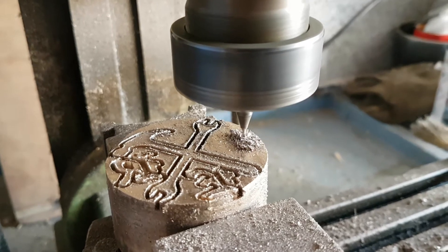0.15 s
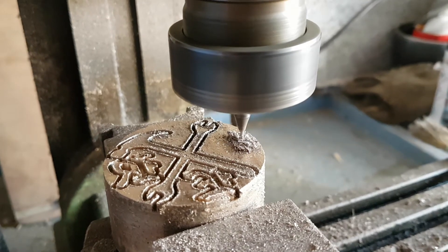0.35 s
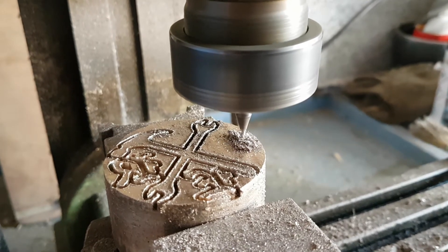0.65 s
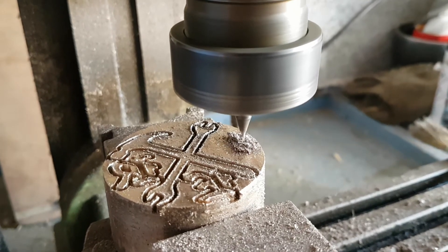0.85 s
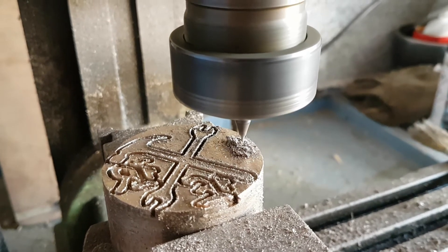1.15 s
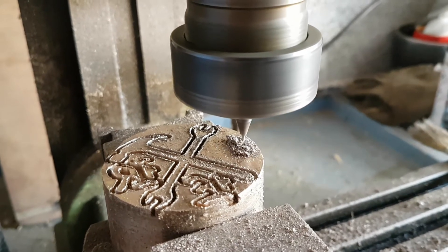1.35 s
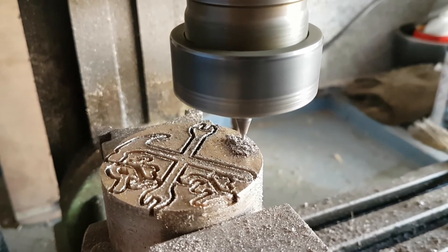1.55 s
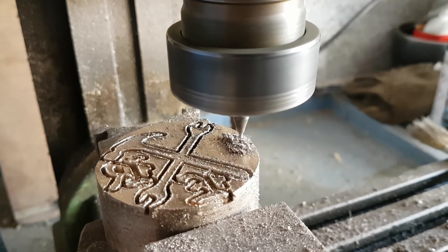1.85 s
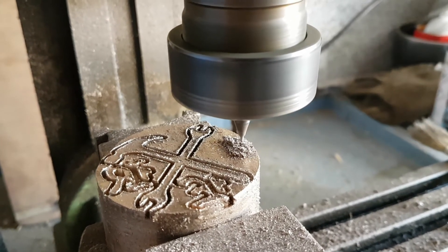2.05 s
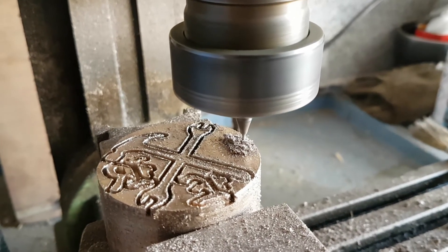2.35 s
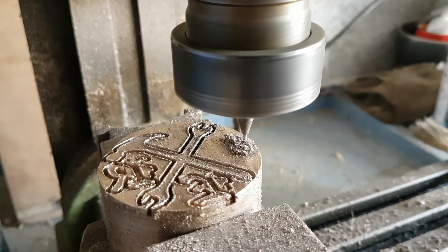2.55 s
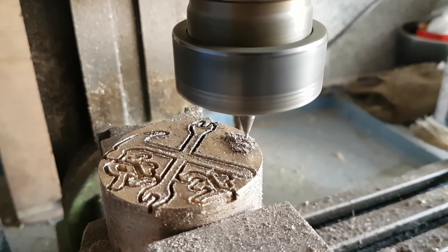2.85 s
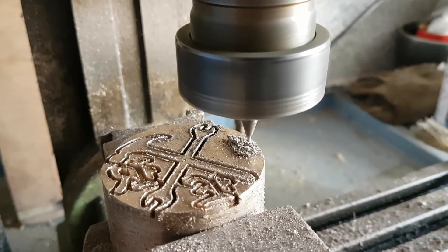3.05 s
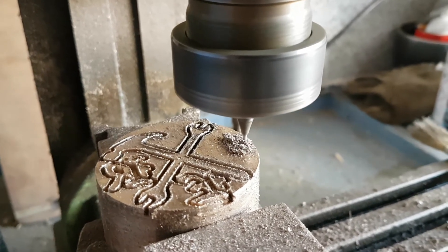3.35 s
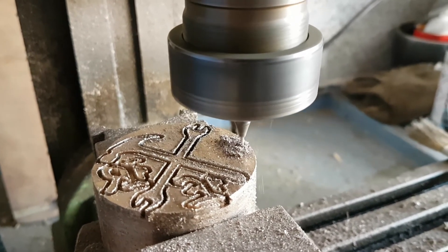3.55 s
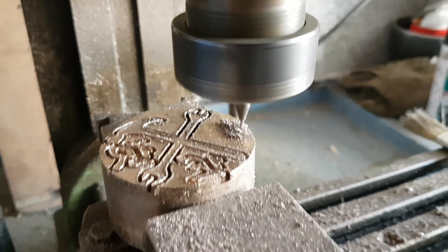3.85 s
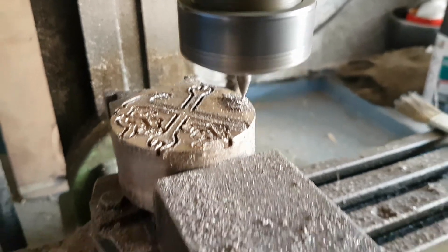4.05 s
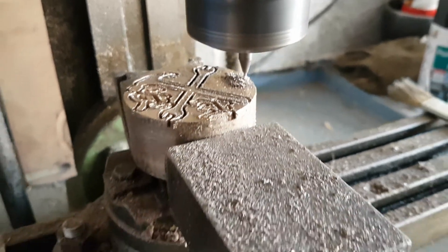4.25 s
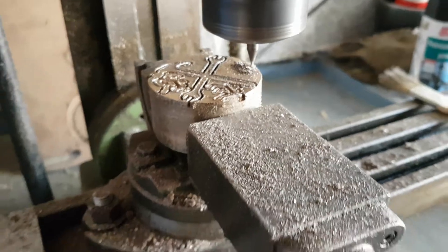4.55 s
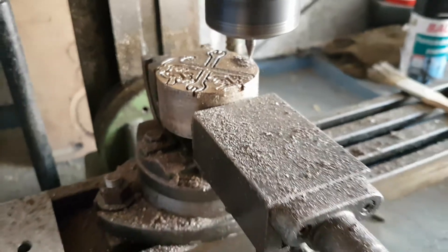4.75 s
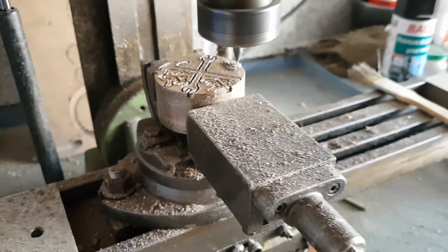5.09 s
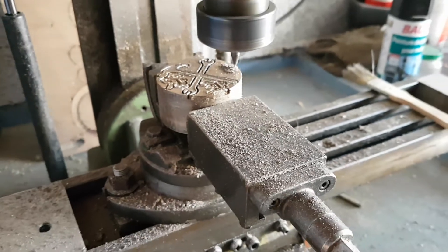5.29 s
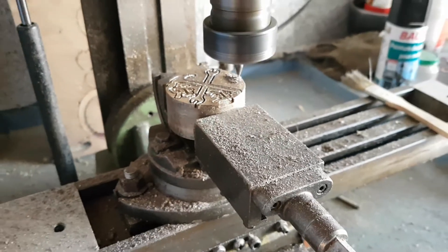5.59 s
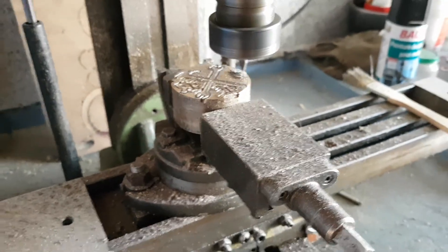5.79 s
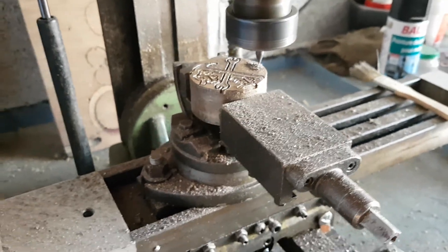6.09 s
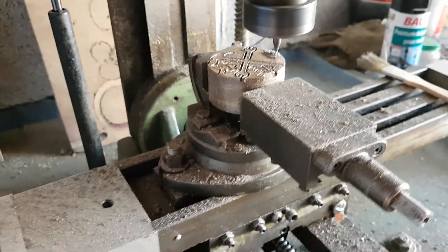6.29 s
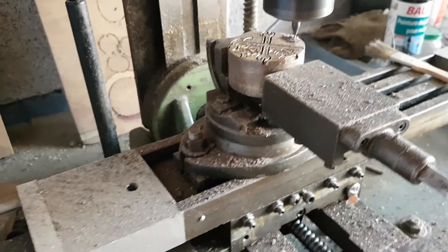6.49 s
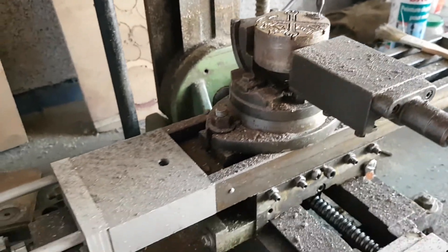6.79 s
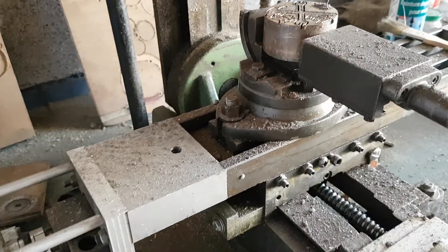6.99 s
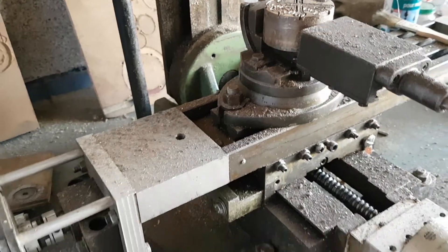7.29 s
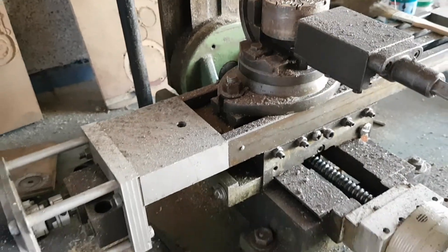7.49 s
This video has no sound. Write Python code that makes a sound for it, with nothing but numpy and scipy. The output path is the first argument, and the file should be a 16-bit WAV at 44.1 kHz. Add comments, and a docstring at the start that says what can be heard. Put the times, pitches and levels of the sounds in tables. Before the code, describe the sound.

A milling machine spindle whines steadily in several metallic pitches over a rough noisy roar as it engraves a metal disc, ending in quick soft ticking.

```python
"""The spindle drive of a milling machine, engraving a metal disc in a small workshop, whines as a comb of tones.
The tones are cosines that share one drifting speed. Over a roar of shaped noise, low hums come and go as wavering
cosines, the feed drive whistles as a tone that hops in pitch, and its slow steps tick as short ringing knocks.
A handheld pair of microphones starts close, then backs away through the room's standing waves, so drive tones
swell and fade on their own."""
import sys
import numpy as np
from scipy import signal
from scipy.fft import irfft, next_fast_len
from scipy.io import wavfile
from scipy.ndimage import uniform_filter1d, map_coordinates

SR = 44100
rng = np.random.default_rng(int(sys.argv[2]) if len(sys.argv) > 2 else 0)


def level_to_linear(level):
    """Convert decibel levels to linear amplitude factors, elementwise."""
    exponent = np.asarray(level, float) / 20
    return 10 ** exponent


def persist_wave(psi):
    """Save psi, clipped to +-1, as 16-bit WAV."""
    counts = np.round(np.clip(psi, -1, 1) * 32767).astype(np.int16)
    wavfile.write(sys.argv[1], SR, np.atleast_2d(counts).T)


N = 336483
T = np.arange(N) / SR  # time in seconds

# Loud tones of the drive. Each row: pitch in Hz, lead of the left side in rad.
TONES = [(630.74, .52), (686.71, .78), (1618.85, -1.72), (1621.67, -2.56), (1674.78, .35), (1677.67, 2.4),
         (2333.52, .11), (2606.94, -2.52), (2662.89, 1.22), (3181.05, 1.96), (3321.62, -.73),
         (3406.24, .86)]
# Backing away, for the fainter tones and the roar. Each row: time in seconds, share of the way (0-1).
AWAY = [(0, 0), (3.9, 0), (4.6, 0.16), (5.3, 0.93), (7.63, 0.9)]
# Path through the standing waves. Each row: time in seconds, share walked (0-1).
WALK = [(0, 0), (3.6, 0), (4.4, .16), (5.2, .51), (6, .6), (6.8, .85), (7.63, 1)]
MESH_HZ, SHAFT_HZ = 329.37, 27.97  # gear mesh and shaft rates
CREEP_FROM_S, STEP_S = 7.045, .0517  # when the feed starts to creep, and time between its slow steps


def along(rows, t=T):
    """Every column of a table after the first, read at the times t."""
    s, *columns = np.transpose(rows)
    return [np.interp(t, s, c) for c in columns]


def drift(count, hz):
    """Slow random curves of rms about 1 that change about hz times a second."""
    knots_per_s = 40
    knots = int(T[-1] * knots_per_s) + 2
    rough = rng.standard_normal((count, 3 * knots))
    low_pass = signal.butter(2, np.clip(hz / 20, .01, .95))
    smooth = signal.filtfilt(*low_pass, rough)[:, knots:2 * knots]  # the middle third has no edge effects
    smooth /= smooth.std(1, keepdims=True)
    curves = [np.interp(T[::16] * knots_per_s, np.arange(knots), row) for row in smooth]
    return np.array(curves).repeat(16, 1)[:, :N]


def spindle_time():
    """Seconds as counted by the spindle: all its tones follow one speed."""
    # Spindle speed. Each row: time in seconds, excess over nominal in parts per thousand.
    speed = [(0.0, -0.03), (0.8, -0.29), (1.6, -0.11), (2.4, -0.22), (3.2, 0.09), (4.0, 0.09), (4.8, 0.04),
             (5.6, 0.39), (6.4, 1.14), (7.2, 0.97), (7.63, 0.74)]
    return np.cumsum(1 + along(speed)[0] / 1000) / SR


def loud_tones(waver=0.045, waver_hz=7, direct_fall_db=-5.8):
    """Direct sound and one echo of each tone meet at each microphone and slide through each other on the walk."""
    # Standing wave of each loud tone at a microphone. Each row: starting level of the direct sound in dB,
    # echo over that in dB, number of wave crests passed on the walk, share of the walk at a crest.
    left_waves = [(-27.5, -18, 1.48, 0.48), (-33, 4.9, -0.45, 1.08), (-31, -8.6, -1.11, .22),
                  (-35.5, -12.5, -1.53, .255), (-33, -2.3, -1.41, .536), (-39.3, -1.9, -2.08, .005),
                  (-42.5, 8.5, -2.5, .009), (-30.5, -9.5, 1.64, 0.55), (-32.5, -3, -1.14, 0.74),
                  (-28.5, -6, 0.36, 1.66), (-23, -10.5, -1.37, 0.17), (-38.5, -7, 1.26, 0.12)]
    right_waves = [(-27.5, -12.4, 0.66, 0.61), (-34, 4.5, -0.73, 1.19), (-27, -3.7, -.37, 1.667),
                   (-30.8, 1.9, .27, 1.427), (-41.6, 8.4, .47, 1.069), (-32.7, -19.4, 1.94, .358),
                   (-33, -2.5, -3, 0.079), (-37.8, 12.7, 0.87, 0.32), (-24, -9, -0.9, .25),
                   (-33, -10.5, 0.5, 0.061), (-22.5, -5.9, 2.04, 0.29), (-33, 2.3, 1, 0.27)]
    # Close pairs that beat slowly. Each row: rough pitch in Hz, spindle time when in step in seconds.
    twins = [(1620, .005), (1676, .046)]
    # The lowest loud tone swells and dips at both microphones alike. Each row: time in seconds, change in dB.
    lowest_swell = [(0, -2), (1.45, 1.5), (3.3, -1), (4.1, 1), (4.4, -2.5), (4.7, 1), (6.2, 3), (6.4, -2.5),
                    (7.63, -1.5)]
    clock, walked, out = spindle_time(), along(WALK)[0], np.zeros((2, N))
    tone_hz, starts = np.array(TONES)[:, 0], rng.random(len(TONES))  # starts are in turns
    for hz, in_step_s in twins:
        pair = abs(tone_hz - hz) < 5
        starts[pair] = starts[pair][0] - tone_hz[pair] * in_step_s
    for (hz, lead), start, *waves in zip(TONES, starts, left_waves, right_waves):
        direct_db, echo_db, crests, crest_at = np.transpose(waves)[:, :, None]
        size, turn = waver * drift(count=2, hz=waver_hz)
        if hz == tone_hz[0]:
            direct_db = direct_db + along(lowest_swell)[0]
        angle = 2 * np.pi * (hz * clock + start) + turn + np.array([[lead], [0]])
        direct = level_to_linear(direct_fall_db * walked) * np.cos(angle)
        echo = level_to_linear(echo_db) * np.cos(angle + 2 * np.pi * crests * (walked - crest_at))
        out += np.sqrt(2) * (1 + size) * level_to_linear(direct_db) * (direct + echo)
    return out


def bass_tones(waver=0.12):
    """Low drive tones, too long in wavelength to pass crests: they waver a little and fall with distance."""
    # Each row: pitch in Hz, starting left level in dB, starting right level in dB, change over the walk in dB.
    bass = [(70.2, -33.5, -32, -5), (211.3, -40, -38.5, -13.5)]
    clock, walked, out = spindle_time(), along(WALK)[0], np.zeros((2, N))
    for (hz, left_db, right_db, fall_db), size in zip(bass, drift(count=2, hz=7)):
        level_db = np.array([[left_db], [right_db]]) + fall_db * walked
        out += np.sqrt(2) * (1 + waver * size) * level_to_linear(level_db) * np.cos(2 * np.pi * hz * clock)
    return out


def side_tones(waver=0.3, fading_db=4.5):
    """Weaker tones of shafts and bearings; once the microphones move, each fades in and out at random."""
    # Each row: pitch in Hz, left level close by in dB, right level close by in dB,
    # level far off before the random fading in dB, lead of the left side in rad.
    weak_tones = [(92.9, -43.0, -44.0, -43.0, -0.3), (140.6, -47, -46, -45, 0),
                  (504.0, -42.0, -42.0, -47.0, -0.1), (530.9, -42.0, -40.0, -44.0, 0.1),
                  (658.8, -40.0, -41.0, -43.0, 0.3), (741.5, -51.0, -49.0, -41.0, 0.4),
                  (823.6, -46, -47, -48, 1.0), (1017.4, -46, -50, -48, 1.8), (1292.0, -46, -52, -51, 2.0),
                  (1453.5, -48, -48, -50, 0), (1592.8, -42.0, -40.0, -42.0, -0.5),
                  (1730.7, -38.0, -36.0, -45.0, 2.6), (1948.1, -37.0, -37.0, -47.0, 0.3),
                  (2004.6, -47, -41, -46, 0.3), (2277.8, -40.0, -36.0, -43.0, -1.5),
                  (2355.2, -42.0, -43.0, -45.0, -0.0), (2594.8, -45.0, -39.0, -44.0, -0.7),
                  (2936.6, -40.0, -45.0, -44.0, -0.7), (2941.3, -42.0, -47.0, -45.0, -0.4),
                  (2992.3, -46, -46, -42, .3), (3265.6, -37.0, -31.0, -37.0, -2.9),
                  (3349.8, -38.0, -39.0, -47.0, -2.8), (3356.5, -40.0, -37.0, -44.0, -2.7),
                  (3377.3, -41.0, -31.0, -42.0, -1.5), (3462.1, -54.0, -38.0, -43.0, 1.5),
                  (3846.4, -47, -53, -51, 3.0), (3924.4, -43.0, -42.0, -48.0, 2.4),
                  (3981.0, -47, -49, -52, 2.5), (4309.3, -46, -50, -51, 2.9), (4885.3, -63, -52, -50, 2.8),
                  (4968.4, -54, -43, -50, 0.9), (5571.7, -55, -48, -51, -3.0), (5655.2, -54, -51, -47, 1.7),
                  (5737.0, -62, -50, -49, 1.4), (5846.3, -58, -51, -48, .4)]
    clock, away, out = spindle_time(), along(AWAY)[0], np.zeros((2, N))
    wobble, fading = drift(count=12, hz=3.3), drift(count=12, hz=0.73)
    for k, (hz, left_db, right_db, far_db, lead) in enumerate(weak_tones):
        pick = (k + np.array([0, 5])) % len(fading)  # the two sides take different curves
        close_db = np.array([[left_db], [right_db]])
        level_db = close_db + away * (far_db - close_db + fading_db * fading[pick])
        angle = 2 * np.pi * (hz * clock + rng.random()) + waver * wobble[pick[0]]
        size = 1 + waver * wobble[pick[1]]
        out += np.sqrt(2) * size * level_to_linear(level_db) * np.cos([angle + lead, angle])
    return out


def comb(above_db=21.0, spread_db=34.0, top_hz=8000, slip_hz=2.82):
    """A forest of faint lines at sums of mesh, shaft and slip rates, coloured like the roar."""
    mesh, shaft, slip = np.mgrid[2:25, -6:6, -1:2].reshape(3, -1)
    hz = mesh * MESH_HZ + shaft * SHAFT_HZ + slip * slip_hz
    loud_hz = np.array(TONES)[:, :1]
    hz = hz[abs(hz - loud_hz).min(0) > 6]  # the loud tones already hold these places
    size, away, out = next_fast_len(N + SR), along(AWAY)[0], np.zeros((2, N))
    bins, same = np.round(hz * size / SR).astype(int), likeness(hz)
    close_share, far_share = np.cos(away * np.pi / 2), np.sin(away * np.pi / 2)
    for place, share in ((0, close_share), (1, far_share)):
        a, b, strength = rng.random((len(hz), 3)).T
        left, other = np.exp(2j * np.pi * a), np.exp(2j * np.pi * b)
        pair = np.array([left, same * left + np.sqrt(1 - same ** 2) * other])
        colour = np.sqrt(roar_power(hz, np.full((1, 1), place))[:, 0])
        level = colour * level_to_linear(above_db - spread_db * np.sqrt(strength))
        lines = np.zeros((2, size // 2 + 1), complex)
        lines[:, bins] = pair * level / (1 + (hz / top_hz) ** 4) * size / 2
        steady = irfft(lines, size)
        # read at spindle time, so the lines follow the spindle speed
        out += share * [map_coordinates(side, [spindle_time() * SR], order=3) for side in steady]
    return out


def low_hums(fade_s=0.23, left_gain_db=-0.2):
    """Low tones that fade in and out, wavering; those near the lowest drive tone beat with it."""
    # Low hums that come and go: feed motors at several pitches, a returning tone near 252 Hz, a swell of the
    # 211 Hz drive tone. Each row: start in seconds, end in seconds (both at mid-fade), pitch in Hz,
    # level before panning in dB, wavering share (0-1).
    hums = [(.3, 0.96, 74.6, -38, 0.14), (1.6, 3.16, 73.4, -34.5, 0.3), (0, 0.97, 165, -40.5, 0.6),
            (2.1, 3.42, 136, -42, 0.1), (2.1, 3.3, 161, -41.5, 0.7), (1.94, 3.1, 282, -42.5, 0.7),
            (5.9, 6.6, 100, -49, .2), (4, 5, 96, -39, .2), (3, 5.4, 195, -45.5, 0.55),
            (5.5, 6, 287, -41.5, 0.8), (0, 1.33, 251.5, -41, .1), (3.5, 7.2, 252.1, -38, 0.07),
            (5.5, 6.4, 211, -31.5, 0), (5.8, 6.6, 236, -41.5, 0.45)]
    start_rad = 1.9  # ahead of the lowest drive tone, sets when they beat
    out = np.zeros(N)
    for start, end, hz, db, waver in hums:
        size, turn = waver * drift(count=2, hz=6.5)
        on = np.clip(np.minimum(T - start, end - T) / fade_s + .5, 0, 1)
        tone = np.cos(2 * np.pi * hz * T + start_rad + 2 * turn)
        out += np.sqrt(2) * level_to_linear(db) * on * (1 + size) * tone
    return out * level_to_linear(np.array([[left_gain_db], [-left_gain_db]]))


def whistle(hop_hz=13, scatter_hz=12, scatter_db=5.5, steps_per_s=45):
    """The drive's switching tone jumps with each motor step: unevenly while cutting, up and down while creeping."""
    # Level of the feed drive whistle. Each row: time in seconds, left level before the scatter in dB.
    whistle_level = [(0, -34.5), (3.3, -35), (3.42, -29.5), (4, -33.5), (4.15, -37), (5.9, -34), (6.2, -27),
                     (6.99, -39.5), (7.04, -24.5), (7.63, -29.5)]
    cutting_hz, creeping_hz = 9103, 9121
    left_over_right_db = 13
    left_db = along(whistle_level)[0]
    creeping = T > CREEP_FROM_S
    step = np.where(creeping, 1000 + (T - CREEP_FROM_S) / STEP_S, T * steps_per_s).astype(int)
    pitch, size = rng.standard_normal((1100, 2))[step].T  # one random pair for each step
    up_down = step % 2 * 2 - 1
    hz = np.where(creeping, creeping_hz + hop_hz * up_down, cutting_hz + scatter_hz * pitch)
    scatter = np.where(creeping, 0, scatter_db * np.minimum(size, 1))
    level_db = left_db + uniform_filter1d(scatter, size=300)
    angle = 2 * np.pi * np.cumsum(uniform_filter1d(hz, size=60)) / SR
    level = level_to_linear(np.array([level_db, level_db - left_over_right_db]))
    return np.sqrt(2) * level * np.cos([angle, angle + 1.85])


def steps():
    """Each slow step knocks the slide, which rings briefly in a few modes."""
    # Ringing of one knock. Each row: pitch in Hz, strength before the soft start and the size of the knock
    # in dB, time to die away by 60 dB in seconds.
    modes = [(400, -5, .05), (970, 1, .04), (1110, -5, .035)]
    loudest_s, loudest_db, fade_db_per_s2 = 7.33, -19, 70
    t, kicks = T[:4000], np.zeros(N)
    ring = sum(level_to_linear(db - 60 * t / t60) * np.sin(2 * np.pi * hz * t) for hz, db, t60 in modes)
    ring *= 1 - np.exp(-t / .002)  # a soft push, not a click
    times = np.arange(CREEP_FROM_S, T[-1], STEP_S)
    kicks[(times * SR).astype(int)] = level_to_linear(loudest_db - fade_db_per_s2 * (times - loudest_s) ** 2)
    return signal.oaconvolve(kicks, ring)[:N]


def roar_power(hz, away, floor_pan_db=-1.5):
    """Power per Hz at both microphones: a wide floor of noise plus humps at certain pitches."""
    # Broad roar. Each row: frequency in Hz, then levels before panning: close and far, in dB per Hz.
    broad = [(30, -75, -87), (60, -72, -72), (78, -61.5, -63), (194, -58, -64.5), (287, -66.5, -69.5),
             (382, -64.5, -65), (580, -58.5, -61), (1066, -64, -65.5), (1345, -70, -70.5),
             (1900, -63, -65.5), (3970, -66, -66), (7120, -70.5, -72), (9600, -77, -77.5),
             (14850, -68, -71), (16800, -103, -109)]
    # Broad humps of noise: housing resonances, and the breathy noise around the lowest loud tone and the
    # whistle. Each row: centre in Hz, width setting in Hz, peak levels before panning: close and far,
    # in dB per Hz, then left minus right in dB.
    humps = [(236, 85, -60, -58.5, 1), (9090, 430, -66.5, -65.5, 6.5), (490, 45, -64, -61.5, -3),
             (634.4, 32, -48, -51, 1), (774, 24, -63.5, -65, -18.5), (1581, 290, -59.5, -59.5, 0.5),
             (2299, 18, -57, -62, -18), (2640, 440, -58.5, -60, 2.5), (2960, 350, -62.5, -64, -10.5),
             (3275, 150, -54.5, -56.5, 8), (5806, 660, -69.5, -62, -10), (8150, 240, -70, -69.5, 9)]
    f, close_db, far_db = np.transpose(broad)
    close_db, far_db = (np.interp(np.log(hz + 1), np.log(f), d) for d in (close_db, far_db))
    floor_pan = level_to_linear(np.array([floor_pan_db, -floor_pan_db]))[:, None, None]
    power = floor_pan * level_to_linear(close_db + away * (far_db - close_db)) ** 2
    for centre_hz, width_hz, near_db, away_db, pan_db in humps:
        shape = 1 / (1 + (2 * (hz - centre_hz) / width_hz) ** 2) ** 3
        peak = level_to_linear(near_db + away * (away_db - near_db)) ** 2 * shape
        power += level_to_linear(np.array([pan_db, -pan_db]))[:, None, None] * peak
    return power


def likeness(hz):
    """How alike the two microphones hear each frequency."""
    # Each row: frequency in Hz, left-right likeness (1 is identical).
    alike = [(60, 0.95), (380, 0.83), (700, 0.85), (1300, 0.16), (4000, 0.017)]
    f, same = np.transpose(alike)
    return np.clip(np.interp(np.log(hz + 1), np.log(f), same), -1, 1)


def roar(patchy_db=1.5, rumble_top_hz=470, treble_hz=3800, throb=(.07, .08, .05)):
    """Random short-time spectra blended from close to far; the treble throbs with the shaft and the mesh."""
    # Low rumble, swelling and easing. Each row: time in seconds, change in dB.
    rumble = [(0, 0), (1, 0), (1.5, 0.5), (3, -0.5), (3.3, -4), (4.9, -3), (5.1, 1.5), (6, 3), (6.3, 1.5),
              (7.63, -5)]
    size, hop = 2048, 512
    frames, hz = N // hop + 5, np.fft.rfftfreq(size, 1 / SR)
    t = np.arange(frames)[:, None] * hop / SR
    a, b, c, d, patches = np.moveaxis(rng.standard_normal((frames, len(hz), 5)), 2, 0)
    patches = uniform_filter1d(uniform_filter1d(patches, size=9, axis=0), size=14, axis=1)
    low = 1 / (1 + (hz / rumble_top_hz) ** 12)  # keeps the rumble to the bass
    swell_db = patchy_db * patches / patches.std() + low * along(rumble, t)[0]
    same, left = likeness(hz), a + 1j * b
    spectra = np.array([left, same * left + np.sqrt(1 - same ** 2) * (c + 1j * d)])
    spectra *= np.sqrt(roar_power(hz, along(AWAY, t)[0])) * level_to_linear(swell_db)
    per_hz = np.sqrt(1.5 * SR / size)  # turns level per Hz into level per frequency bin
    waves = signal.istft(spectra.transpose(0, 2, 1), nperseg=size, noverlap=size - hop)[1]
    noise = per_hz * waves[:, :N]
    treble = signal.sosfiltfilt(signal.butter(2, treble_hz, "high", fs=SR, output="sos"), noise)
    rates = SHAFT_HZ, 2 * SHAFT_HZ, MESH_HZ
    return noise + treble * sum(depth * np.cos(2 * np.pi * r * T) for depth, r in zip(throb, rates))


def scene():
    """All sources at the two microphones."""
    drive = loud_tones() + bass_tones() + side_tones() + comb()
    return drive + low_hums() + whistle() + steps() + roar()


def top_cut(x):
    """Nothing passes above the cut-off."""
    return signal.sosfilt(signal.butter(12, 16530, fs=SR, output="sos"), x)


def record(dry):
    """The finished mix, as it is stored."""
    return top_cut(dry)


dry = scene()
out = record(dry)
persist_wave(out)
```